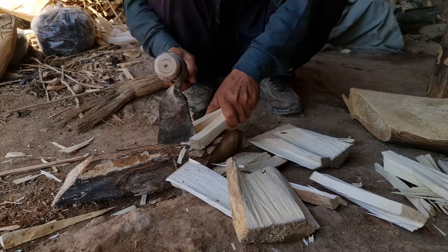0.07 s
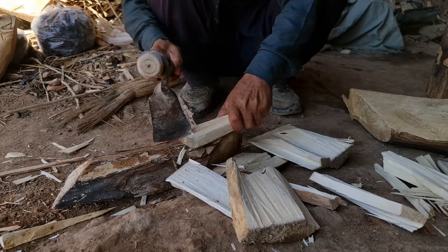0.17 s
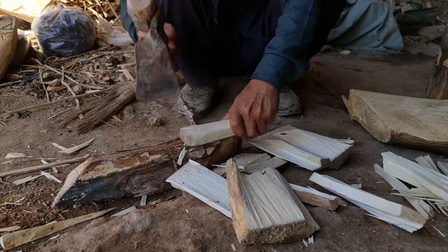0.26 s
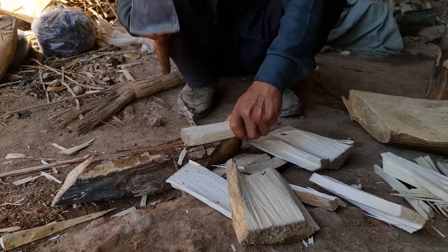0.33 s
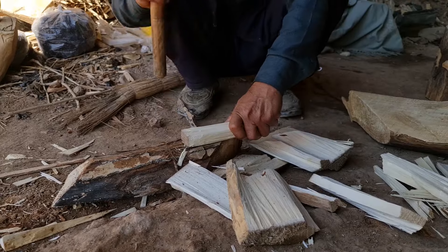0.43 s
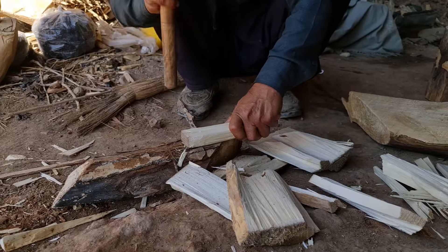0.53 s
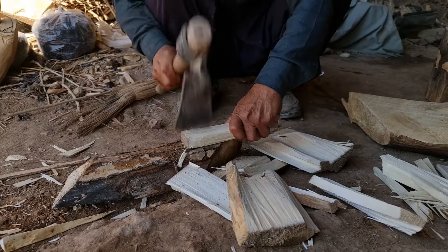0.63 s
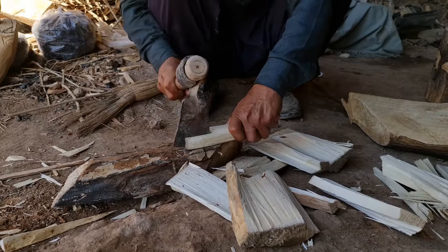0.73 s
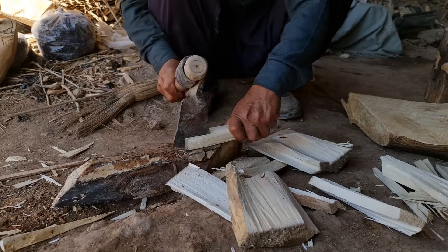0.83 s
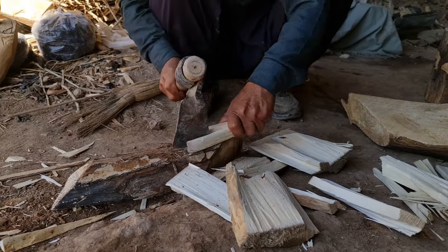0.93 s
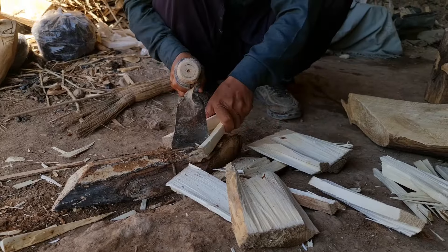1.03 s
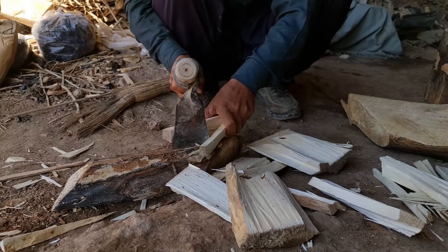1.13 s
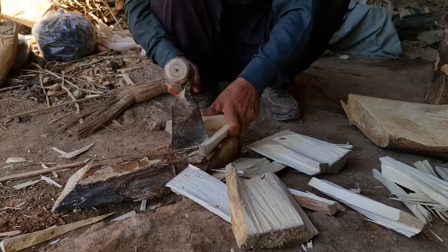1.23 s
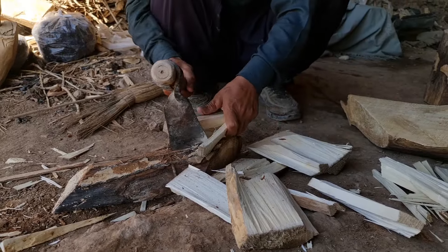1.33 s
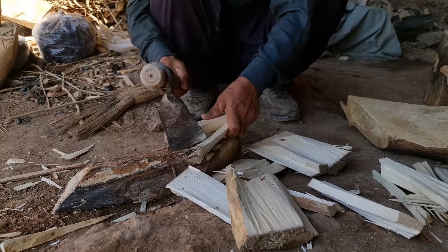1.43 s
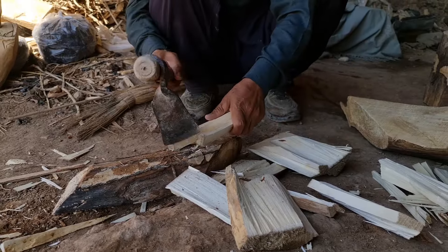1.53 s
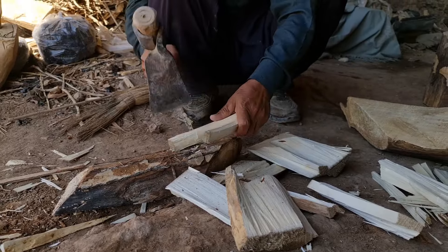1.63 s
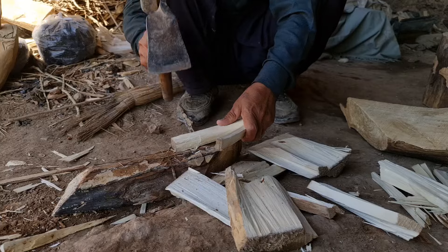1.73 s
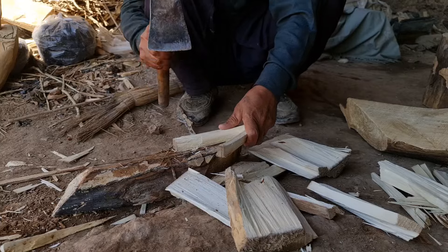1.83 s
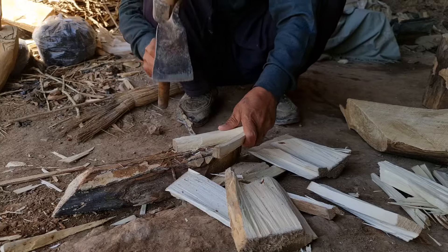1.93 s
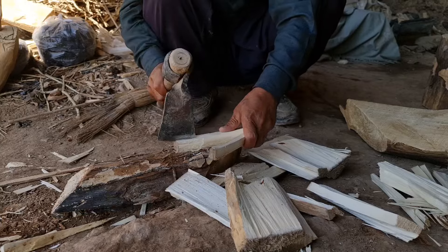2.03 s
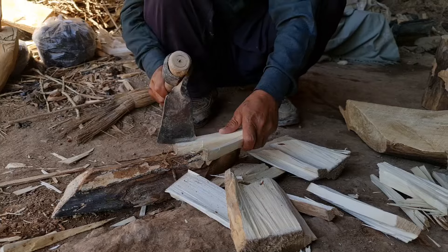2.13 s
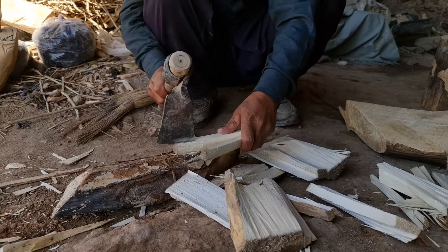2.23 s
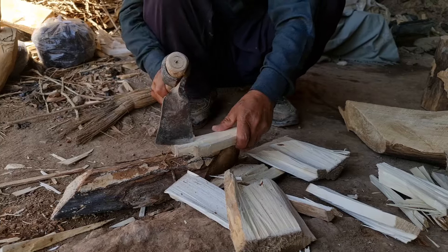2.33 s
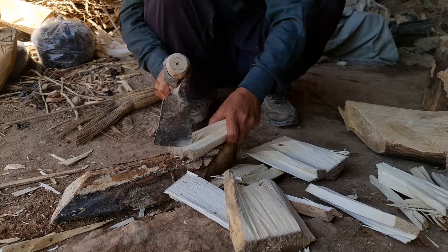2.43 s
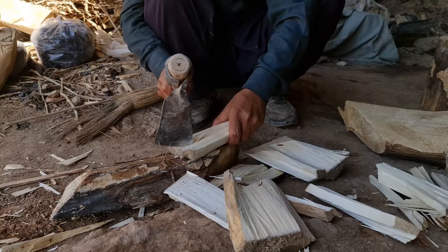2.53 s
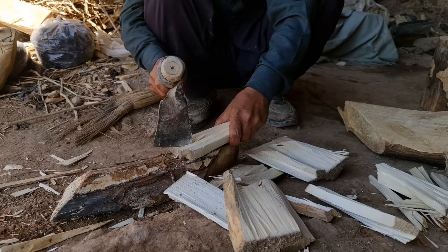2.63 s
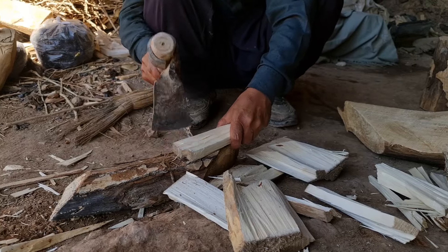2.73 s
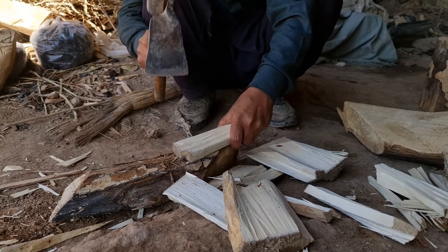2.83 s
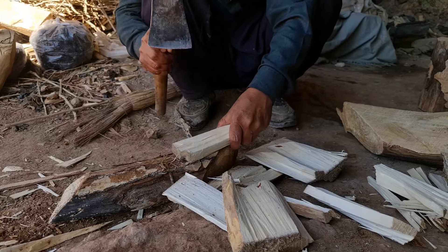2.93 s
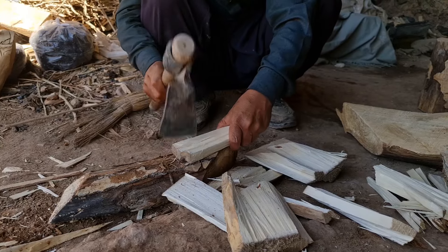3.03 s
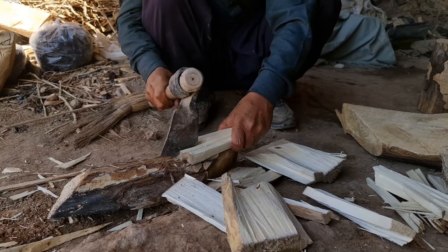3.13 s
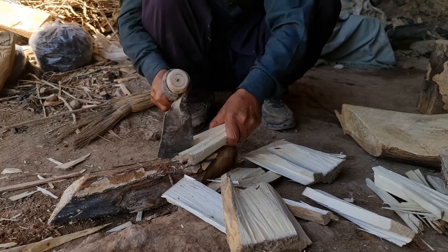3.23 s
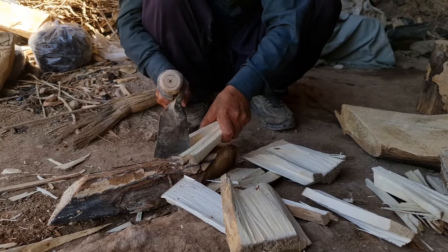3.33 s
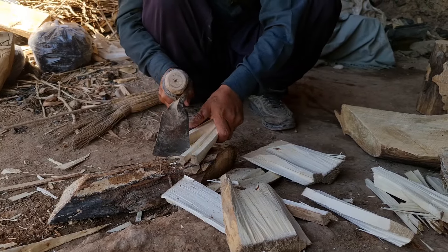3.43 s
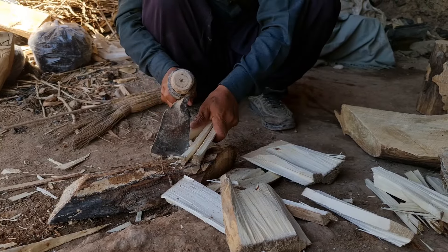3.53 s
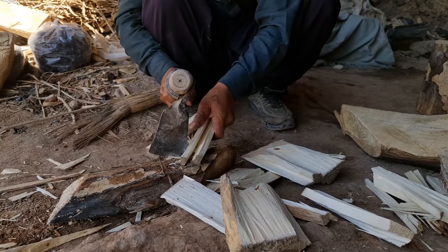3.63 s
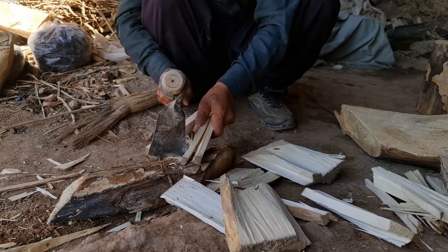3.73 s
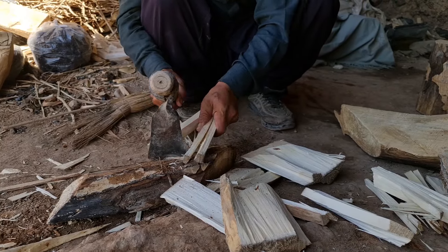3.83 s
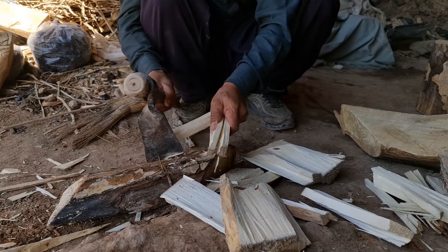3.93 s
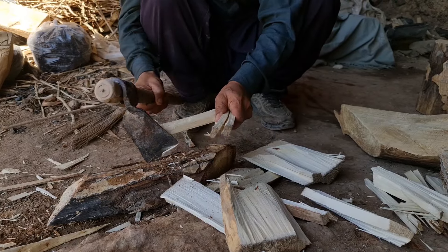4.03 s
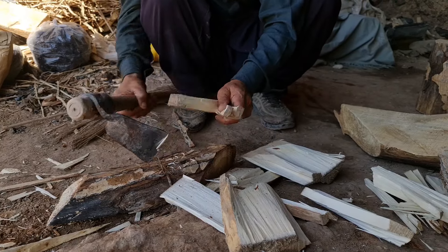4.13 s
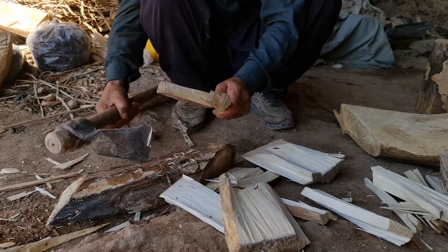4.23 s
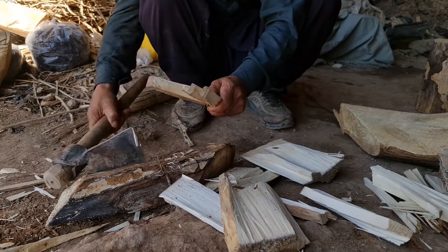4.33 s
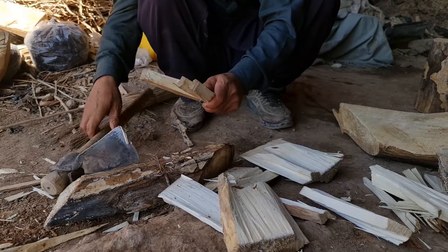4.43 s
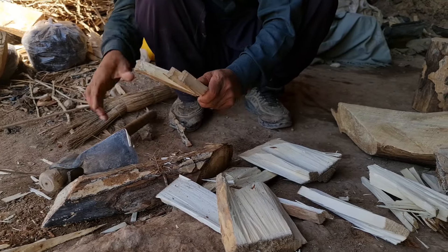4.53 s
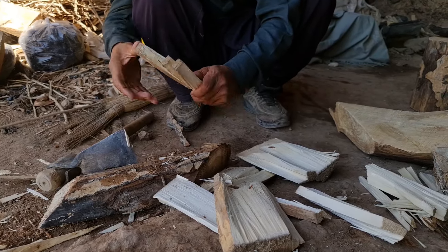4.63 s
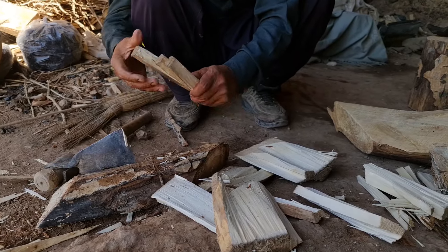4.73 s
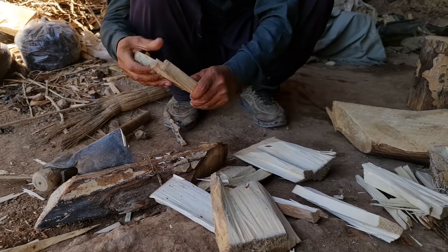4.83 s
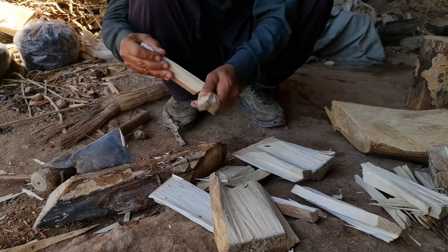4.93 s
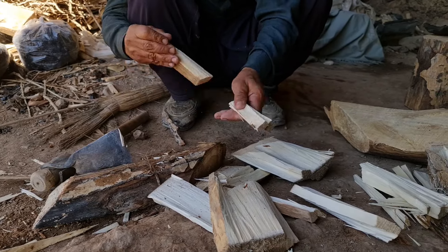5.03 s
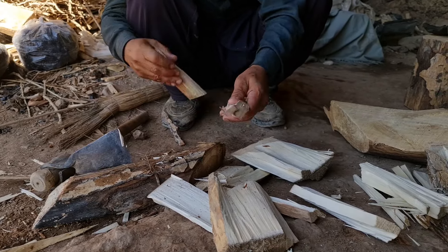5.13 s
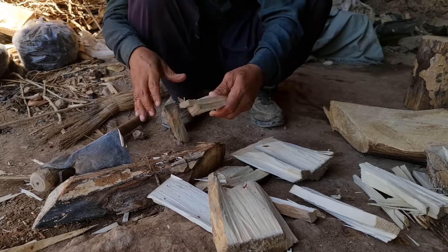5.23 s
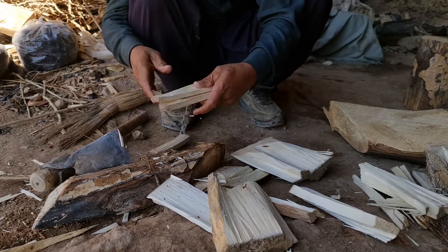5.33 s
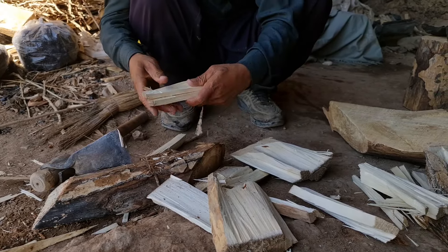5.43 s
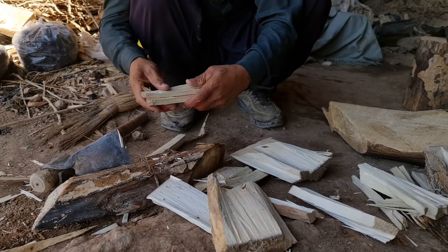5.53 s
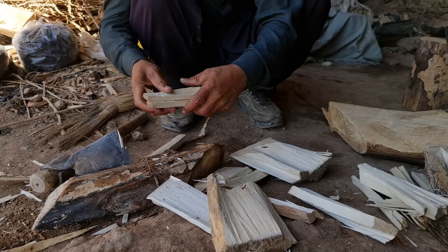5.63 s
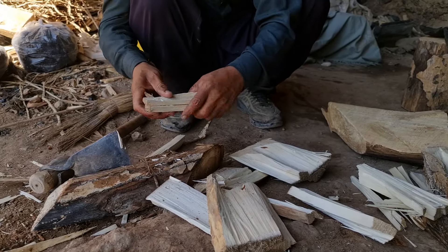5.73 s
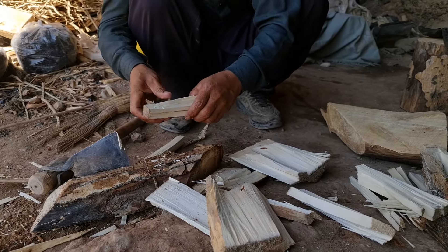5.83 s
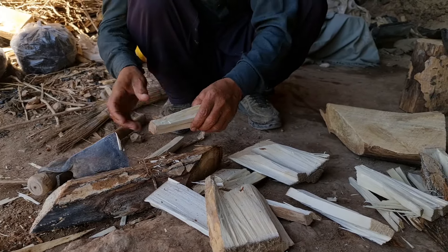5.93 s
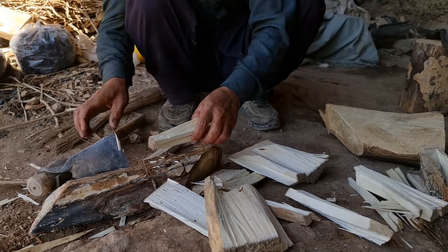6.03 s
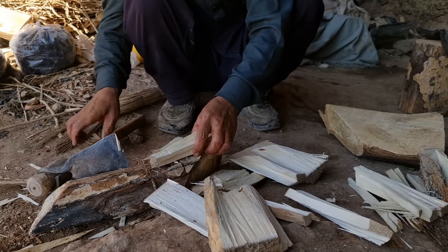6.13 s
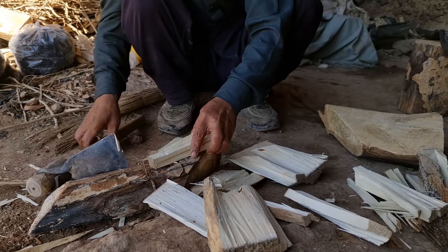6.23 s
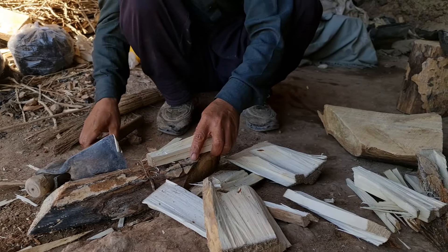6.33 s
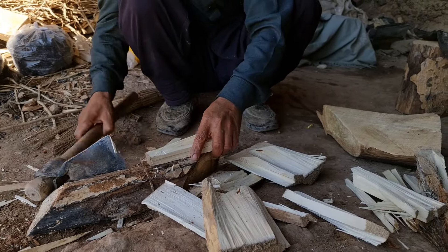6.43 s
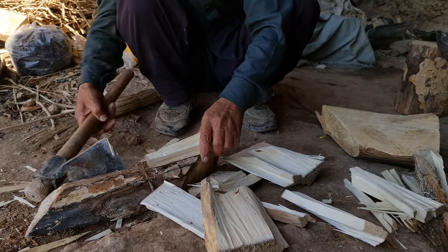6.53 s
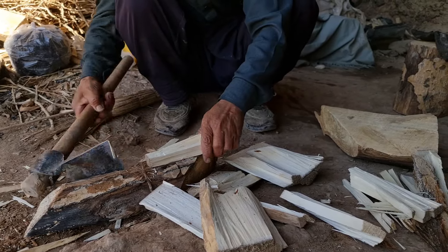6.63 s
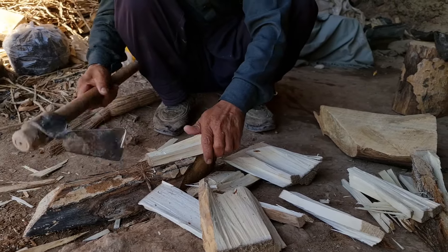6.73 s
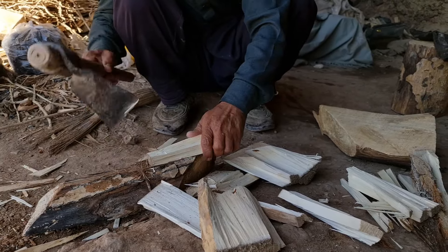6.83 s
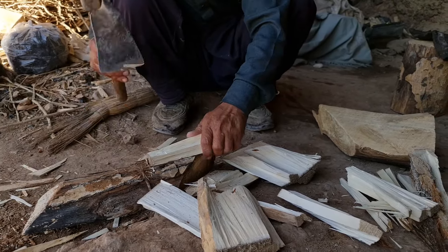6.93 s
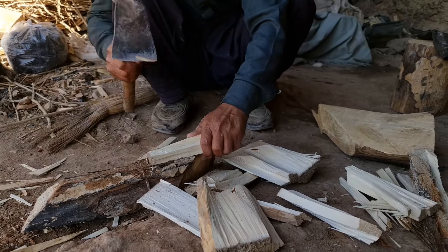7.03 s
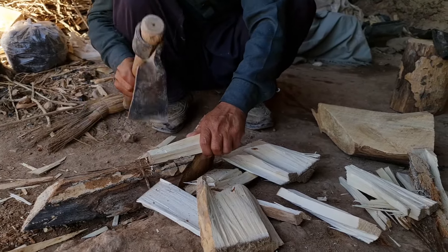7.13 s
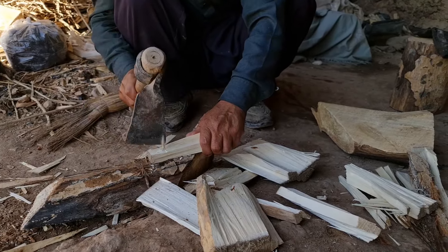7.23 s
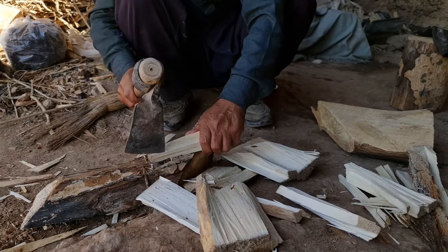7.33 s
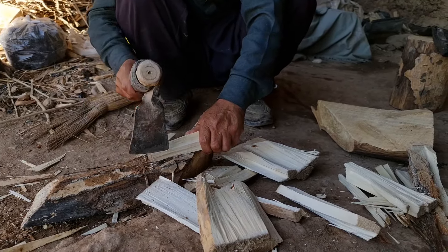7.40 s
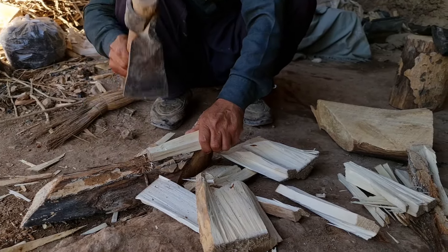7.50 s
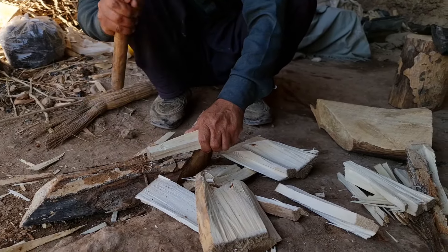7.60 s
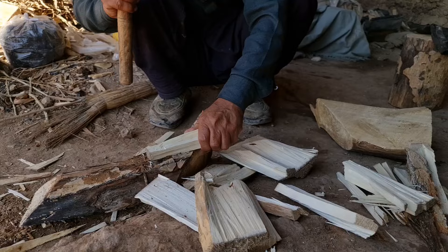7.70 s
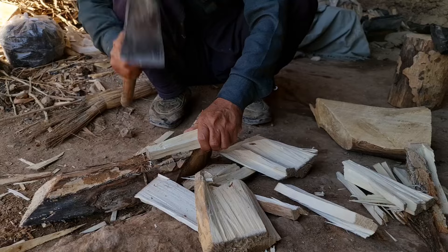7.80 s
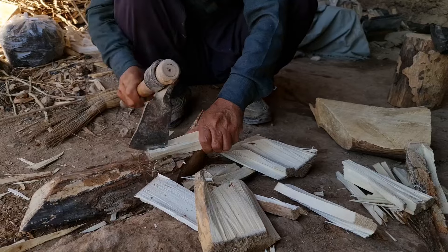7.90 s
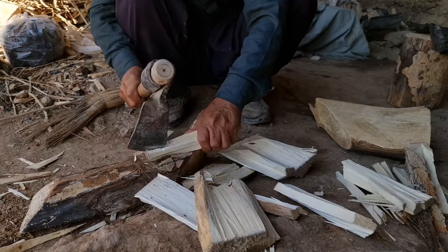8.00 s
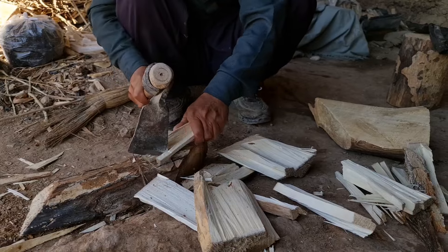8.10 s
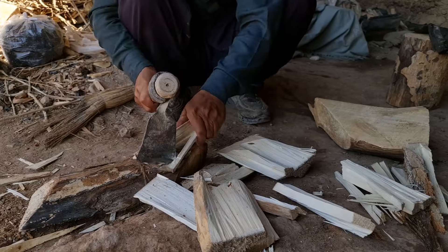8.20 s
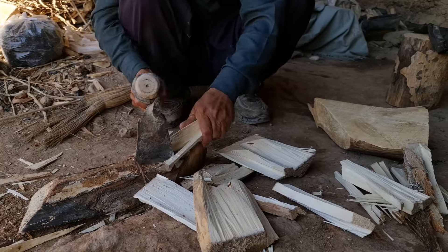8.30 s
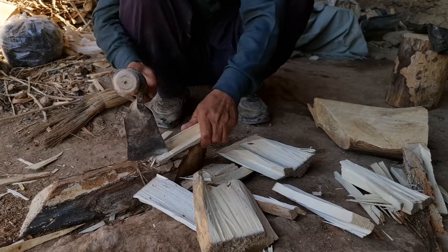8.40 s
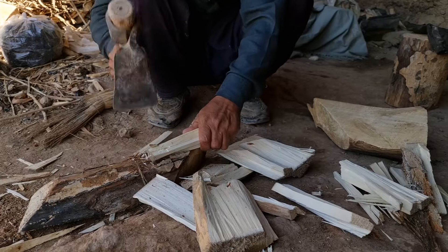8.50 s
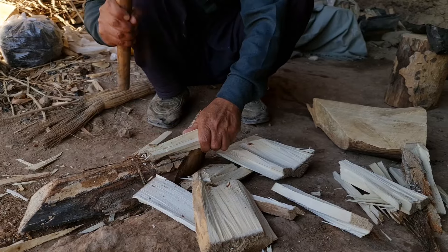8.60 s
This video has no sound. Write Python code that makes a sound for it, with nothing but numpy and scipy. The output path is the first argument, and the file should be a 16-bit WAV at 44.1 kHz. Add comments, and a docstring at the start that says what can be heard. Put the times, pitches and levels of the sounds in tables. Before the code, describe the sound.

A hatchet splits sticks on a log under an open shelter, heard by a nearby stereo microphone with little echo. Blows land at about 0.6, 2.0 and 3.1 seconds, each a woody crack with a short low thump from the ground. After each, fibres snap and tear as the blade is levered, sharpest at 0.9, 2.3 and 3.6 seconds. From 3.9 to 5.5 seconds wood and tool knock softly on the earth floor, with a small snap at 4.9, then faint rustling of handled wood. A duller blow falls at 7.2 seconds and a hard one at 7.9, followed by crackling splinters until about 8.5. Behind it, a faint distant engine drones unevenly, fades near 3 seconds and idles from 3.4. A second low hum joins around 4.6 and grows near 8 seconds. Quiet outdoor air continues throughout.

```python
"""A hatchet chops sticks on a log under an open shelter, heard from a stereo microphone nearby.
Three blows land in the first 3.1 s, fibres snapping and tearing as the blade is levered, while a far
engine pulls unevenly. From 3.4 s it idles; wood and tool knock on the earth floor and a second low hum
joins. Two more blows fall at 7.2 and 7.9 s. Quiet outdoor air lies behind it all."""
import sys
import numpy as np
from scipy import signal
from scipy.fft import rfft, irfft, next_fast_len
from scipy.io import wavfile
from scipy.ndimage import uniform_filter1d, map_coordinates

SR = 44100
rng = np.random.default_rng(int(sys.argv[2]) if len(sys.argv) > 2 else 0)


def transcribe(signal):
    """Save signal, clipped to [-1, 1], as a 16-bit WAV file at the path in sys.argv[1]."""
    frames = np.atleast_2d(signal).T
    limited = np.clip(frames, -1, 1)
    pcm = np.round(limited * 32767).astype(np.int16)
    wavfile.write(sys.argv[1], SR, pcm)


N = 381906

# resonances of the stick and the log under it: pitch_hz, width_hz, level_db
STICK_MODES = [(554.7, 100, -2), (644.7, 120, 2), (990, 460, -3.5), (1346, 200, 1.5), (1463, 190, -1.5)]
LOG_MODES = [(56, 35, 0), (88.3, 140, -5.5), (149, 200, 14), (224.4, 27, 3.5), (323, 75, 2)]
# blows and rebounds: start_s, crack_db, crack_hz, wood_hz, treble_db, wood_db, thump_db, contact_ms
# (treble, wood and thump are relative to the crack)
CHOPS = [(0.6475, -1, 1970, 1480, -10.5, -8, -12.5, 3), (0.664, -9, 2100, 528, -6, -8.5, -3, 3.8),
         (0.6824, -19, 1877, 1196, -18.5, -2.5, -16, 2.9), (2.0211, -13, 1450, 1000, -3.5, 0.5, 0, 2.2),
         (2.0224, -13.5, 2560, 1470, -5, -23, -24, 1.1), (3.0873, -6, 4650, 986, -4, -6, -3.5, 4.2),
         (3.0993, -32, 4157, 455.5, -7, -7.5, 18, 2), (7.2215, -29.5, 1616, 644, 5.5, 15, 15.5, 1.46),
         (7.2281, -27, 1476, 453, -12, -5, -17, 5), (7.8726, -7.5, 2170, 1260, -2.5, 0, -12, 0.95),
         (7.8752, -5, 5200, 1200, -7, -12, -21.5, 2.3), (7.8873, -8.5, 1580, 630, -12, -9.5, -27.5, 17),
         (7.9092, -13, 2120, 1090, -16, -29, -5.5, 2.3), (7.939, -24.5, 1468, 1390, -13, 2.5, -3.5, 2.48)]
def hatchet_chops():
    """Near the microphone, the blade cracks the stick and thumps the log."""
    return contacts(CHOPS, STICK_MODES, LOG_MODES, wood_width=0.49, crack_width=0.54, room_db=-6.5)


# breaking fibres: start_s, crack_db, crack_hz, treble_db (relative to the crack)
SNAPS = [(0.0448, -30.5, 3570, 4.5), (0.165, -38, 3800, -3), (0.3202, -34, 4150, -8),
         (0.8816, -44, 2130, -5), (0.9023, -25, 5440, -1), (0.9239, 0, 4600, -7), (0.9458, -9.5, 3100, -16),
         (0.9564, -16.5, 3080, 1), (0.968, -22.5, 3330, -22), (1.4582, -34, 3680, -11),
         (1.547, -54, 1576, 21.5), (1.6698, -49.5, 4190, 5.5), (2.3406, -9.5, 3750, 2),
         (2.3605, -32.5, 3790, -1), (2.397, -27, 4200, -2), (2.4024, -19, 4060, -10),
         (2.4272, -23, 3420, 13), (2.4342, -19.5, 3930, -34), (2.6955, -36.5, 3830, -12),
         (3.2867, -38, 3866, 7.5), (3.3024, -38, 5000, -3), (3.3182, -34.5, 5330, 5),
         (3.4203, -34.5, 5070, -30), (3.475, -26.5, 3550, 5), (3.521, -57.5, 5000, 21),
         (3.5619, -9, 3330, 5), (3.6535, -26.5, 3650, 2.5), (3.7444, -39, 3460, -8),
         (3.7725, -38, 3300, -9.5), (3.8602, -40, 2600, -2), (3.8883, -25, 3700, 2.5),
         (3.9103, -20.5, 3380, 6), (4.1666, -30.5, 3400, 2.5), (4.3719, -53, 1910, 18),
         (4.4677, -59, 1490, 19.5), (4.485, -47.5, 4050, 19.5), (4.927, -19.5, 4540, 7),
         (4.948, -21.5, 3980, 4), (5.6124, -38, 5930, 4), (5.701, -46, 6000, 11.5),
         (5.8257, -54.5, 1534, 13.5), (5.875, -55, 3470, 15), (5.9254, -45.5, 3460, 6),
         (6.201, -45.5, 2870, -5), (6.8924, -44.5, 2091, -7), (7.4585, -26.5, 3114, -20.5),
         (7.961, -40, 5500, 7), (8.046, -34, 5370, 16), (8.0599, -19.5, 5440, 3), (8.1076, -39, 3410, -36),
         (8.14, -33, 4400, 0), (8.1619, -32, 3200, 1.5), (8.3375, -42.5, 3800, -17),
         (8.388, -43, 3190, -30)]
def fibre_snaps():
    """Fibres break under the levered blade; weaker snaps ring less of the stick and log."""
    wood_hz, contact_ms = 920, 0.59
    rows = []
    for start_s, crack_db, crack_hz, treble_db in SNAPS:
        wood_db = -12.5 + 0.42 * crack_db
        thump_db = wood_db - 14.5
        rows.append((start_s, crack_db, crack_hz, wood_hz, treble_db, wood_db, thump_db, contact_ms))
    return contacts(rows, STICK_MODES, LOG_MODES, wood_width=1.7, crack_width=0.4, room_db=-8)


# resonances of the tool handle and its thud on the floor: pitch_hz, width_hz, level_db
HANDLE_MODES = [(553, 7.8, 6), (650, 50, -1.5), (970, 165, -6.5), (1200, 55, -5.5), (1392, 38, 2)]
THUD_MODES = [(141, 83, 1), (209, 65, 3.5), (351, 144, -3.5)]
# touchdowns: start_s, crack_db, wood_hz, treble_db, wood_db, thump_db (last three relative to crack)
KNOCKS = [(3.9161, -37.5, 1360, -3, -16, -2.5), (4.2069, -54.5, 710, -29, 1, 17),
          (4.2756, -47, 587, -36, 11.5, 12), (4.3, -47, 640, -31, 12, 13.5),
          (4.3302, -67, 697, -10, 17, 14), (4.3997, -53.5, 503, -14, 10.5, 18),
          (4.4554, -63.5, 1360, -7, 13, -1), (4.5291, -37.5, 510, 3.5, -1.5, 8),
          (4.5514, -50.5, 655, -12, 12, 18.5), (4.6492, -54.5, 655, -34, 8.5, 6),
          (5.2676, -35.5, 953, 2, 2.5, -3), (5.3533, -30, 1200, -6.5, -15, -10),
          (5.37, -45.5, 740, -18, 8, 9.5), (5.423, -47.5, 613, -15, -2.5, 2),
          (5.4589, -60, 470, 8, 12.5, 19), (7.3365, -46.5, 940, -3, 10.5, 6),
          (7.3488, -49.5, 452, 2, -15, 9), (8.2146, -38, 1460, 9, -3.5, -18),
          (8.4505, -36.5, 690, -3, -6.5, -8)]
def floor_knocks():
    """Wood and tool touch down on the shelter's earth floor."""
    crack_hz, contact_ms = 3060, 3.6
    rows = [(start_s, crack_db, crack_hz, *rest, contact_ms) for start_s, crack_db, *rest in KNOCKS]
    return contacts(rows, HANDLE_MODES, THUD_MODES, wood_width=0.22, crack_width=0.26, room_db=-4)


# resonances of the crack, and a bright treble that peaks near 13 kHz: pitch_hz, width_hz, level_db
CRACK_MODES = [(1910, 290, -1), (2900, 1000, -2), (3800, 1700, 0.5), (5200, 2100, -5)]
TREBLE_MODES = [(6700, 3100, -1.5), (11340, 3300, -0.5), (13600, 3500, 0)]
def contacts(rows, wood_modes, base_modes, wood_width, crack_width, room_db):
    """A kick and a jagged force ring crack, treble, wood and base; widths are fractions of pitch."""
    out = np.zeros((2, N + SR))
    t = np.arange(SR // 10) / SR
    kick = 1.0 * (t == t[4])
    for start_s, crack_db, crack_hz, wood_hz, *shares_db, contact_ms in rows:
        decay = np.exp(-1000 * t / contact_ms)
        jerks = decay * amp(1.1 * rng.exponential(size=len(t)))  # fibres give way unevenly
        crack = lambda f: modes(CRACK_MODES, f) * band(crack_hz, crack_width * crack_hz, f)
        treble = lambda f: modes(TREBLE_MODES, f) ** 2
        # where the wood is held picks its modes
        wood = lambda f: modes(wood_modes, f) * band(wood_hz, wood_width * wood_hz, f)
        base = lambda f: modes(base_modes, f) ** 2
        sound = np.zeros((2, len(t)))
        for body, share_db in zip([crack, treble, wood, base], [0, *shares_db]):
            force = jerks * rng.standard_normal(len(t))
            force = force / np.linalg.norm(force) + 0.53 * kick
            # the shelter hears the wood from all sides, so it gets the kick's even colour
            direct, spread = map(unit_rms, filtered(np.array([force, kick]), body))
            sound += amp(crack_db + share_db - 2) * np.array([direct, spread]) / np.abs(direct).max()
        stereo = shelter(*sound, room_db)
        out[:, round(start_s * SR):][:, :stereo.shape[1]] += stereo
    return out[:, :N]


# bursts of tearing and spells of hands rustling the wood: start_s, hold_s, level_db
STRAINS = [(0.045, 0.023, -61.5), (0.13, 0.04, -61), (0.272, 0.041, -65.5), (0.847, .03, -61.5),
           (0.911, .012, -43.5), (0.933, 0.0051, -31.5), (1.02, 0.224, -67.5), (1.451, .012, -53.5),
           (1.5, 0.34, -68.5), (2.356, 0.062, -41), (2.695, 0.012, -54.5), (3.238, .37, -57.5),
           (3.647, 0.17, -64), (3.872, 0.056, -50), (4.063, 0.13, -61.5), (4.43, 0.2, -65),
           (4.94, 0.0057, -41.5), (5.277, .15, -69.5), (5.612, 0.01, -61.5), (5.699, .012, -60.5),
           (5.792, 0.12, -67.5), (6.042, .03, -71), (6.22, 0.21, -68.5), (6.479, 0.061, -68),
           (6.695, 0.13, -69), (7.422, .04, -63.5), (7.703, .2, -70), (7.921, 0.056, -54.5),
           (8.053, 0.042, -42.5), (8.105, 0.08, -49.5), (8.327, 0.043, -63.5), (8.433, 0.023, -57),
           (8.51, 0.12, -67)]
def strain_db():
    """Each burst rises fast, sags while it holds and dies back to a faint rustle."""
    rise_db_per_s, sag_db_per_s, fall_db_per_s, rustle_db = 700, 11.5, 550, -80.5
    start_s, hold_s, level_db = np.transpose(STRAINS)[..., None]
    grid_s = np.arange(0, N / SR, .001)
    age_s = grid_s - start_s
    bursts_db = (level_db + rise_db_per_s * np.minimum(age_s, 0)
                 - sag_db_per_s * np.clip(age_s, 0, hold_s)
                 - fall_db_per_s * np.maximum(age_s - hold_s, 0))
    return np.interp(np.arange(N) / SR, grid_s, np.maximum(bursts_db.max(axis=0), rustle_db))


# colour of tearing fibre: frequency_hz, level_db
FIBRE_SPECTRUM = [(600, -43), (1100, -12.5), (2000, -13.5), (3500, -5), (5500, -4.5), (7500, -5),
                  (10000, -10), (13500, -7), (16000, -14.5)]
def fibre_tearing():
    """Strained fibres and moving hands: clumps of ticks over a thin rustle, brighter under strain."""
    level_db = strain_db()
    fires = rng.random(N) < 1500 * amp(4 * wobble(40)) / SR
    ticks = fires * amp(2.2 * rng.exponential(size=N)) * rng.standard_normal(N)
    rustle = .5 * amp(3 * wobble(25)) * rng.standard_normal(N)
    spectra = signal.stft(unit_rms(ticks) + rustle, nperseg=256)[2]
    colour_db = 3.5 * unit_rms(patches(spectra.shape, bins=5, frames=24))  # each splinter has its own
    spray = signal.istft(spectra * amp(colour_db), nperseg=256)[1][:N]
    crackle = unit_rms(filtered(spray, lambda hz: amp(log_interp(FIBRE_SPECTRUM, hz))))
    treble = filtered(crackle, lambda hz: hz ** 4 / (hz ** 4 + 7000 ** 4))
    brightness = np.clip(amp(.35 * (level_db + 50)), 0, 1)
    sound = amp(level_db) * (crackle - (1 - brightness) * treble)
    out = np.zeros((2, N + SR))
    for start in range(0, N, SR // 5):  # fresh echoes every 0.2 s keep the crackle's colour varied
        piece = np.pad(sound[start:start + SR // 5], (0, 512))
        stereo = shelter(piece, piece, room_db=-4)
        out[:, start:start + stereo.shape[1]] += stereo
    return out[:, :N]


# resonances of the ground: pitch_hz, width_hz, level_db
GROUND_MODES = [(52, 17, 0), (113, 40, -4), (190, 68, -4.5)]
# full blows reaching the ground: start_s, peak_db
BOOMS = [(0.649, -26), (2.022, -23), (3.089, -26), (7.224, -26.5), (7.874, -17)]
def ground_booms():
    """The earth floor rings low and short under each full blow."""
    kick = 1.0 * (np.arange(SR // 4) == 0)
    ring = filtered(kick, lambda f: modes(GROUND_MODES, f) / (1 + 1j * f / 150) ** 2)
    blows = np.bincount([round(s * SR) for s, db in BOOMS], [amp(db) for s, db in BOOMS], N)
    return signal.fftconvolve(blows, ring / np.abs(ring).max())[:N]


# the engine's two runs: time_s, firing_hz, level_db
PULLING = [(0.0, 36.6, -44.5), (0.54, 36.3, -45), (0.69, 35.2, -39.5), (0.8, 37.16, -44.5),
           (1.05, 37.04, -45), (1.12, 36.1, -45), (1.43, 38.3, -45), (1.6, 36.0, -45.5), (1.76, 38.3, -46),
           (1.96, 37.8, -49), (2.05, 38.17, -37.5), (2.09, 38.66, -53), (2.2, 38.9, -47.5),
           (2.45, 38.02, -50.5), (2.78, 39.97, -60), (2.95, 38.5, -56)]
IDLING = [(3.4, 42.36, -57.5), (4.15, 41.38, -55.5), (4.25, 43.29, -49.5), (7.97, 43.43, -52.5),
          (8.3, 42.83, -50), (8.66, 43.35, -49.5)]
# their harmonics: firing_multiple, relative_db
PULL_HARMONICS = [(1, -23), (2, -13), (3, -5), (4, -23), (5, 0), (6, -11), (8, -17), (9, -28), (11, -24.5)]
IDLE_HARMONICS = [(1, -7), (2, -2.5), (3, -3), (4, -6.5), (5, -13), (6, -37), (8, -19), (9, -21)]
def distant_engine():
    """Far off, an engine drones at multiples of its firing rate: uneven under load, steadier at idle."""
    pulling = drone(PULLING, PULL_HARMONICS, waver=0.006, flutter_db=2.5)
    return pulling + drone(IDLING, IDLE_HARMONICS, waver=0.0033, flutter_db=-0.1)


# a second low hum: time_s, pitch_hz, level_db
HUM = [(4.6, 58.8, -58.5), (7, 60.25, -67), (8, 62.27, -46), (8.66, 60.7, -45)]
def low_hum():
    """One wavering tone in the background of the second half."""
    return drone(HUM, [(1, 0)], waver=0.0212, flutter_db=3.5)


def drone(run, harmonics, waver, flutter_db):
    """Unsteady harmonics that fade at the ends of their run; a run from 0 s is already sounding."""
    pitch_hz, level_db = curves(run)
    t = np.arange(N) / SR
    start_s, end_s = run[0][0] or -0.44, run[-1][0] + 0.168
    fade = np.clip(np.minimum(t - start_s, end_s - t) / 0.14, 0, 1)
    cycles = np.cumsum(pitch_hz * (1 + waver * wobble(17))) / SR
    tones = sum(amp(db + flutter_db * wobble(11)) * np.sin(2 * np.pi * (multiple * cycles + rng.random()))
                for multiple, db in harmonics)
    return np.sqrt(2) * amp(level_db) * fade * tones


# colour of the open air: frequency_hz, level_db
AIR_SPECTRUM = [(15, -37), (25, -13), (70, -2), (148, -7.5), (299, -19.5), (403, -24), (542, -27.5),
                (1220, -30.5), (2390, -40.5), (3780, -44), (7030, -57), (9720, -86), (11400, -63),
                (15800, -84.5)]
# its slow swell: time_s, relative_db
AIR_SWELL = [(0.0, -43), (3.0, -43), (3.93, -45.5), (4.46, -42), (4.77, -46.5), (5.19, -44.5), (6.5, -47),
             (7.79, -46.5), (8.01, -42), (8.66, -47.5)]
def outdoor_air():
    """Far traffic and open air beyond the shelter, swelling a little in patches."""
    swells = patches((129, N // 128 + 2), bins=2, frames=40)
    noise = diffuse_noise(N, lambda hz, t: amp(2.6 * unit_rms(swells[:, :len(t)])))
    air = unit_rms(filtered(noise, lambda hz: amp(log_interp(AIR_SPECTRUM, hz))))
    return amp(curves(AIR_SWELL)[0] - 3) * air


def faint_whine(pitch_hz=3130, width_hz=140, level_db=-76.5, end_s=7.4):
    """A narrow hiss, unrelated left and right, that wavers and then is gone."""
    hiss = filtered(rng.standard_normal((2, N)), lambda f: band(pitch_hz, width_hz, f) ** 2)
    fade = np.clip((end_s - np.arange(N) / SR) / .3, 0, 1)
    return amp(level_db + 2.3 * wobble(5)) * fade * unit_rms(hiss)


# the shelter's reverberation: frequency_hz, t60_s, level_db
SHELTER_TAIL = [(100, 0.22, 7.5), (293, 0.22, -4), (980, 0.24, -2), (3070, 0.16, 5), (12000, 0.14, -5.5)]
def shelter(direct, spread, room_db, left_lead_s=7.5e-5):
    """Direct sound arrives straight and off nearby logs and earth; spread sound fills the shelter."""
    hz, t60_s, db = np.transpose(SHELTER_TAIL)
    tail_db = lambda f, t: log_interp(np.c_[hz, db], f) - 60 * t / log_interp(np.c_[hz, t60_s], f)
    tail = diffuse_noise(SR // 3, lambda f, t: amp(tail_db(f, t)))
    clutter = diffuse_noise(512, lambda f, t: 1) * amp(-60 * np.arange(512) / SR / .008)
    out = amp(room_db) / np.linalg.norm(tail[0]) * signal.fftconvolve(spread[None], tail, axes=1)
    echoes = amp(-2) / np.linalg.norm(clutter[0]) * signal.fftconvolve(direct[None], clutter, axes=1)
    # the microphone's left side is nearer the log
    placing = lambda f: amp([[-.3], [.3]]) * np.exp(1j * np.pi * left_lead_s * np.outer([1, -1], f))
    out[:, :len(direct)] += filtered(direct, placing) + echoes[:, :len(direct)]
    return out


# diffuse sound at the microphone: frequency_hz, left_right_correlation
STEREO_LIKENESS = [(60, 1), (190, 0.86), (360, .7), (690, .15), (1400, 0), (15000, 0.093)]
def diffuse_noise(size, gain):
    """Noise from all sides, shaped by gain(hz, s): alike in the bass, unrelated in the treble."""
    hz, t, (a, b) = signal.stft(rng.standard_normal((2, size)), SR, nperseg=256)
    angle = np.arccos(log_interp(STEREO_LIKENESS, hz))[:, None] / 2
    mid, side = a * np.cos(angle), b * np.sin(angle)
    spectra = np.array([mid + side, mid - side]) * gain(hz[:, None], t)
    return signal.istft(spectra, SR, nperseg=256)[1][:, :size]


def amp(db):
    return 10 ** (np.asarray(db) / 20)


def unit_rms(x):
    return x / np.sqrt(np.mean(x ** 2) + 1e-20)


def log_interp(points, hz):
    point_hz, values = np.transpose(points)
    return np.interp(np.log(hz + 1), np.log(point_hz + 1), values)


def curves(rows):
    """One value per sample for each column after the time."""
    time_s, *columns = np.transpose(rows)
    return [np.interp(np.arange(N) / SR, time_s, column) for column in columns]


def wobble(rate_hz):
    """A smooth random curve."""
    knots = rng.standard_normal(int(N * rate_hz / SR) + 4)
    return map_coordinates(knots, [np.arange(N) * rate_hz / SR])


def patches(shape, bins, frames):
    """Random values smoothed over frequency and time."""
    return uniform_filter1d(uniform_filter1d(rng.standard_normal(shape), bins, 0), frames, 1)


def filtered(x, response):
    n = x.shape[-1]
    padded = next_fast_len(n + 8192)
    return irfft(rfft(x, padded) * response(np.fft.rfftfreq(padded, 1 / SR)), padded)[..., :n]


def band(pitch_hz, width_hz, f):
    """The causal response of one resonance."""
    return 1j * f * width_hz / (pitch_hz ** 2 - f ** 2 + 1j * f * width_hz)


def modes(table, f):
    """A body's resonances, summed with alternating sign."""
    return sum((-1) ** k * amp(db) * band(hz, width_hz, f) for k, (hz, width_hz, db) in enumerate(table))


def scene():
    """Woodwork under the shelter, engine and air beyond it."""
    wood = hatchet_chops() + floor_knocks() + fibre_snaps() + fibre_tearing()
    return wood + distant_engine() + low_hum() + outdoor_air() + ground_booms() + faint_whine()


def record(dry):
    """The microphone drops the deepest bass and keeps nothing above its band limit."""
    bass_hz, top_hz = 22, 16100
    return filtered(dry, lambda f: f ** 2 / (f ** 2 + bass_hz ** 2) * np.clip((top_hz - f) / 400, 0, 1))


dry = scene()
out = record(dry)
transcribe(out)
```